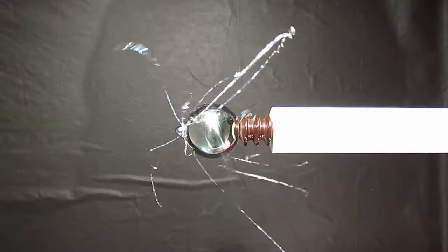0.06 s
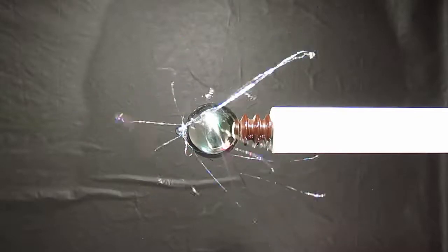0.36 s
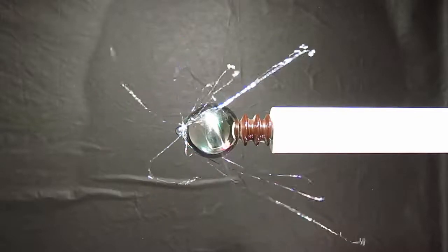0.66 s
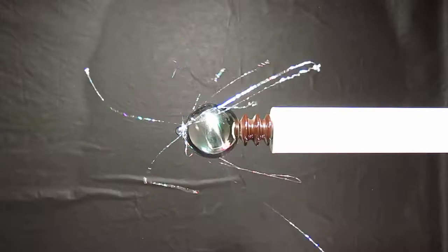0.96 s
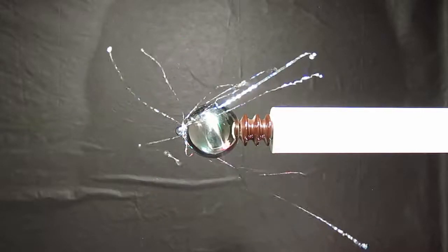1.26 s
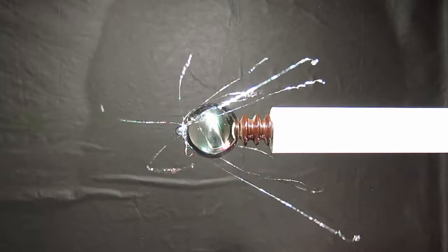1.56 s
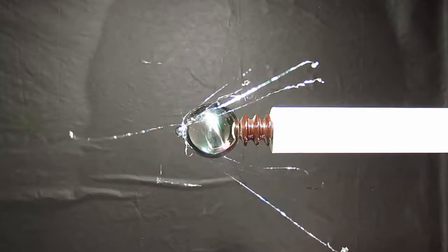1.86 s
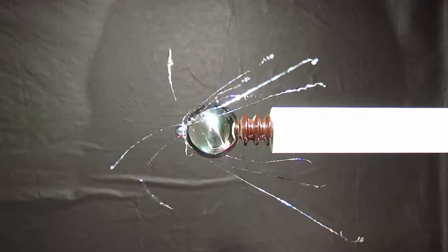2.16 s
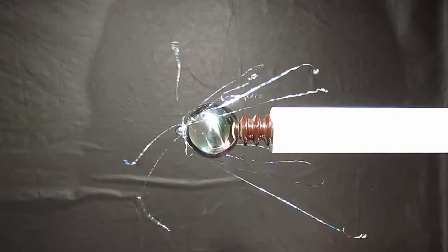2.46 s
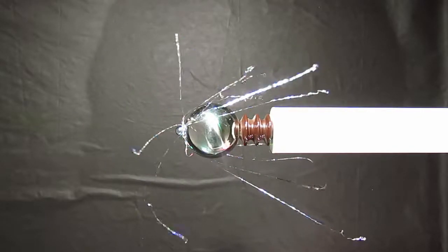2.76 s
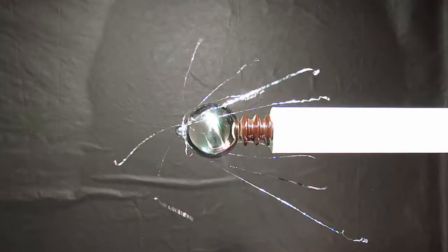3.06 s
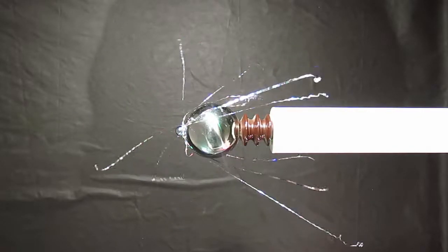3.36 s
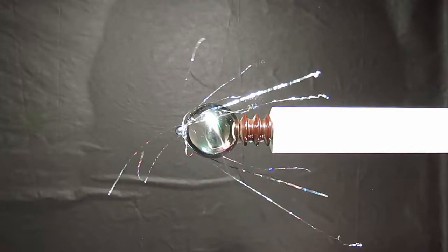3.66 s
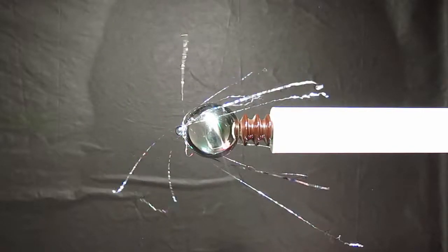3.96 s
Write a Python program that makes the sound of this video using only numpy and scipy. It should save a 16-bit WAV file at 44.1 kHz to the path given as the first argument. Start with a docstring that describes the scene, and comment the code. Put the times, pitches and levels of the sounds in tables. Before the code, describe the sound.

In a quiet room, high-voltage discharge sizzles softly on a metal ball, then quickly settles to a faint, high fizz. Low electrical hum and hiss continue throughout, with one tiny spark tick near the start and one near the end.

```python
"""Corona streamers on a metal ball electrode sizzle in a quiet room.
Thousands of tiny discharges a second add up to a bright noise, which dies down during the
first second and lingers faintly over mains hum, a thin whine and a steady hiss with two soft
puffs. A tiny spark ticks in the sizzle, and a doubled one near the end."""
import sys
import numpy as np
from scipy import signal
from scipy.fft import rfft, irfft
from scipy.io import wavfile

SR = 44100
rng = np.random.default_rng(int(sys.argv[2]) if len(sys.argv) > 2 else 0)


def unload_wav(signal):
    """Save mono or channel-first audio to the path in sys.argv[1] as 16-bit WAV at rate SR, clipped to [-1, 1]."""
    wavfile.write(
        sys.argv[1],
        SR,
        np.round(np.clip(np.atleast_2d(signal).T, -1, 1) * 32767).astype(np.int16),
    )


N = 176400

# spectrum of the corona sizzle: f/Hz, relative level/dB
SIZZLE_SPECTRUM = [(1500, -16), (3000, -6.5), (4800, -6.5), (6300, -4), (8000, -3.5), (10000, 0),
                   (11500, 1.5), (12500, -0.5), (13400, -2), (14800, -6), (15800, -10)]
# decay of the sizzle: t/s, rms level/dB
SIZZLE_ENVELOPE = [(0, -38.5), (.11, -43), (.19, -43), (.3, -45), (.41, -48), (.52, -52.5), (.9, -56.3),
                   (1.5, -60), (2.4, -65.5), (4, -68)]
# spectrum of the opening rush: f/Hz, relative level/dB
RUSH_SPECTRUM = [(600, -29), (850, -1.5), (1100, 2), (1550, 1), (1900, -10), (2800, -11), (3450, -5),
                 (4600, -24)]
# spectrum of the weak streamers: f/Hz, relative level/dB
FIZZ_SPECTRUM = [(9500, -18), (11000, -7), (11800, 1), (12400, -2), (13100, -6), (15000, -22)]
# partials of the hum: harmonic number, rms level/dB, left minus right/dB
HUM_PARTIALS = [(1, -46.3, -.5), (2, -57.5, 2), (3, -59, 1), (4, -65.5, 1.5), (5, -71.5, -2), (7, -77, 0),
                (10, -75, -3), (12, -79.5, 2)]
# hiss in phase at the two ears: f/Hz, level in a 1 Hz band/dB
HISS_MID_SPECTRUM = [(20, -94), (45, -85.5), (80, -78), (140, -80.5), (400, -83), (600, -84.5), (800, -84),
                     (1200, -85.5), (1700, -86.5), (2800, -87.8), (5000, -91), (8500, -96.5), (13000, -99),
                     (14800, -97.5), (15800, -104)]
# hiss in antiphase at the two ears: f/Hz, level in a 1 Hz band/dB
HISS_SIDE_SPECTRUM = [(35, -100), (65, -88), (110, -76), (220, -73), (500, -76.5), (650, -79.5),
                      (1000, -84), (1900, -91), (4500, -96.5), (8500, -99.3), (13000, -99), (14800, -97),
                      (15800, -104)]
# puffs in the hiss: centre t/s, half-width/s, f/Hz, level/dB
PUFF_EVENTS = [(0.256, 0.014, 3100, -51), (1.574, .015, 726, -52)]
# sparks: onset t/s, level/dB, left minus right/dB
SPARK_EVENTS = [(.344, -41.5, -3), (3.4803, -39.5, -1), (3.4815, -47, -1)]
# spectrum of a spark: f/Hz, relative level/dB
SPARK_SPECTRUM = [(2000, -28), (5500, -10), (7600, -1), (9300, -7), (11000, 1.5), (12900, -3), (14300, -21)]


def amp(db):
    """Amplitude grows tenfold for every 20 dB."""
    return 10 ** (np.asarray(db) / 20)


def unit(x):
    """Normalisation to an rms of 1."""
    return x / np.sqrt(np.mean(x ** 2) + 1e-20)


def colour(x, points):
    """Spectral shaping by (f/Hz, gain/dB) points joined on a logarithmic frequency axis."""
    hz, db = np.transpose(points)
    f = np.fft.rfftfreq(x.shape[-1], 1 / SR)
    gain = amp(np.interp(np.log(f + 1), np.log(hz), db))
    return irfft(rfft(x) * gain, x.shape[-1])


def spread(three, correlation):
    """Partial correlation: the ears share one signal, and each has another of its own."""
    return np.sqrt(correlation) * three[0] + np.sqrt(1 - correlation) * three[1:]


def stereo_noise(spectrum, correlation):
    """Filtered Gaussian noise of rms 1, partly correlated between the ears."""
    return unit(colour(spread(rng.standard_normal((3, N)), correlation), spectrum))


def drift(rate_hz):
    """Low-pass noise of rms 1 serves as a slow random modulation."""
    f = np.fft.rfftfreq(N, 1 / SR)
    return unit(irfft(rfft(rng.standard_normal(N)) * np.exp(-(f / rate_hz) ** 2), N))


def corona_sizzle(t, discharges_per_s=1800, impulse_share=0.45):
    """Shot noise: tiny discharges arrive at random, partly smeared by the room into Gaussian noise."""
    sizes = amp(2.2 * np.minimum(rng.exponential(1, (3, N)), 4))
    signs = rng.choice([-1, 1], (3, N))
    fires = rng.random((3, N)) < discharges_per_s / SR
    impulses = np.sqrt(impulse_share) * unit(sizes * signs * fires)
    smeared = np.sqrt(1 - impulse_share) * rng.standard_normal((3, N))
    pressure = spread(impulses + smeared, correlation=0.15)
    envelope = amp(np.interp(t, *np.transpose(SIZZLE_ENVELOPE)))
    return envelope * unit(colour(pressure, SIZZLE_SPECTRUM))


def midrange_rush(t, fade_db_per_s=54):
    """Exponential decay: a soft noise loses equal decibels in equal times as the sizzle settles."""
    return amp(-46.5 - fade_db_per_s * t) * stereo_noise(RUSH_SPECTRUM, correlation=0.58)


def streamer_fizz(t, fade_db_per_s=4, flutter_db=2.2):
    """Amplitude modulation: weak streamers keep up a narrow noise band that flutters and slowly fades."""
    noise = stereo_noise(FIZZ_SPECTRUM, correlation=0.25)
    return amp(-57.5 - fade_db_per_s * t + flutter_db * drift(rate_hz=45)) * noise


def mains_hum(t, fundamental_hz=100):
    """A harmonic series on twice the mains frequency; the overtones waver more than the fundamental."""
    out = np.zeros((2, N))
    for harmonic, db, pan_db in HUM_PARTIALS:
        waver = 0.039 * drift(rate_hz=1.9) if harmonic == 1 else 0.072 * drift(rate_hz=4.1)
        tone = np.sqrt(2) * np.cos(2 * np.pi * (harmonic * fundamental_hz * t + rng.random()))
        out += amp([[db + pan_db / 2], [db - pan_db / 2]]) * (1 + waver) * tone
    return out


def background_hiss(swell_db=0.36):
    """Antiphase noise widens the low mids; in-phase noise centres the presence range."""
    white = rng.standard_normal((2, N)) * np.sqrt(SR / 2)  # unit power per hertz
    mid = colour(white[0], HISS_MID_SPECTRUM) * amp(swell_db * drift(rate_hz=13))
    side = colour(white[1], HISS_SIDE_SPECTRUM)
    return np.array([mid + side, mid - side])


def electrical_whine(t, hz=15735, rms_db=-81):
    """A steady pure tone lies near the upper limit of hearing."""
    return np.sqrt(2) * amp(rms_db) * np.sin(2 * np.pi * hz * t)


def hiss_puff(t, centre, half_width, hz, db):
    """Band-pass noise under a Gaussian envelope is heard as a brief swell of the hiss."""
    band = [(hz / 10, -42), (hz / 2, -21), (hz, 0), (2 * hz, -21), (10 * hz, -42)]
    envelope = amp(db) * np.exp(-((t - centre) / half_width) ** 2)
    return envelope * unit(colour(rng.standard_normal(N), band))


def spark(t, start, db, pan_db, crack_decay_s=0.0011, room_t60_s=0.13):
    """Incoherent addition: a brief bright crack and its reverberation sum in power."""
    age = np.maximum(t - start, 0)
    crack = np.exp(-age / crack_decay_s)
    room_tail = amp(-8.5) * np.exp(-np.log(1000) * age / room_t60_s)
    envelope = (t >= start) * np.hypot(crack, room_tail)
    ear_gains = amp([[db + pan_db / 2], [db - pan_db / 2]])
    return ear_gains * envelope * stereo_noise(SPARK_SPECTRUM, correlation=0.3)


def scene():
    """Superposition: the pressures of corona, background, puffs and sparks add at each ear."""
    t = np.arange(N) / SR
    corona = corona_sizzle(t) + midrange_rush(t) + streamer_fizz(t)
    background = mains_hum(t) + background_hiss() + electrical_whine(t)
    puffs = sum(hiss_puff(t, *row) for row in PUFF_EVENTS)
    sparks = sum(spark(t, *row) for row in SPARK_EVENTS)
    return corona + background + puffs + sparks


def record(dry):
    """Band limiting: a steep linear-phase low-pass filter removes the highest treble."""
    cutoff_hz = 15780
    taps = signal.firwin(1023, cutoff_hz, window=("kaiser", 9), fs=SR)
    return signal.oaconvolve(dry, taps[None], "same")


dry = scene()
out = record(dry)
unload_wav(out)
```